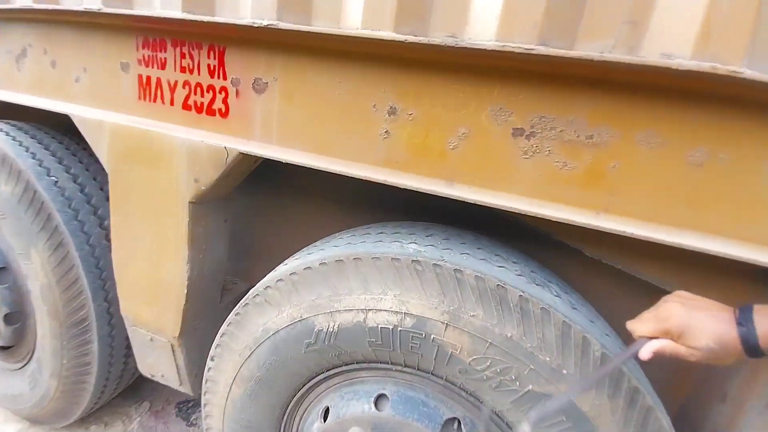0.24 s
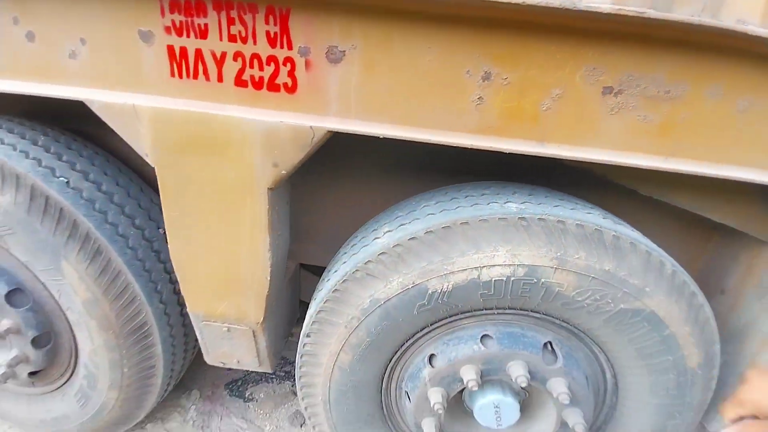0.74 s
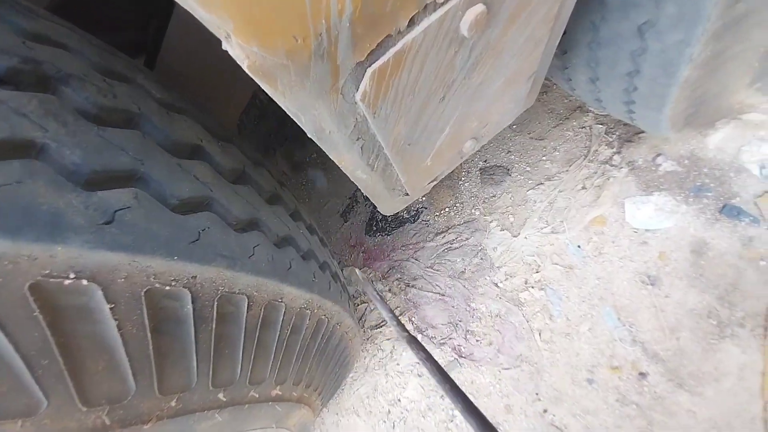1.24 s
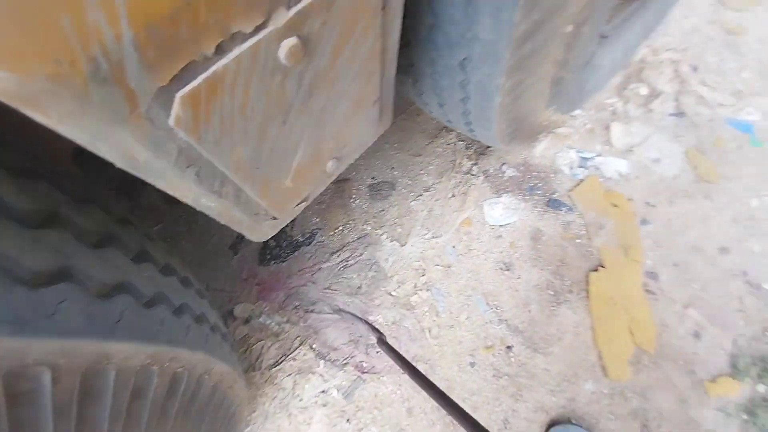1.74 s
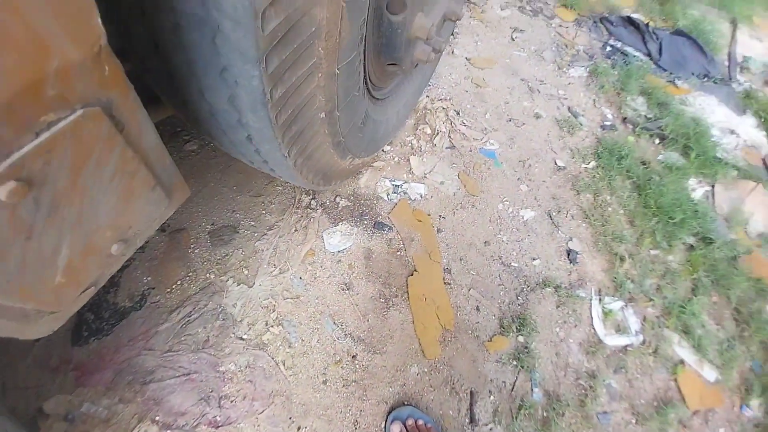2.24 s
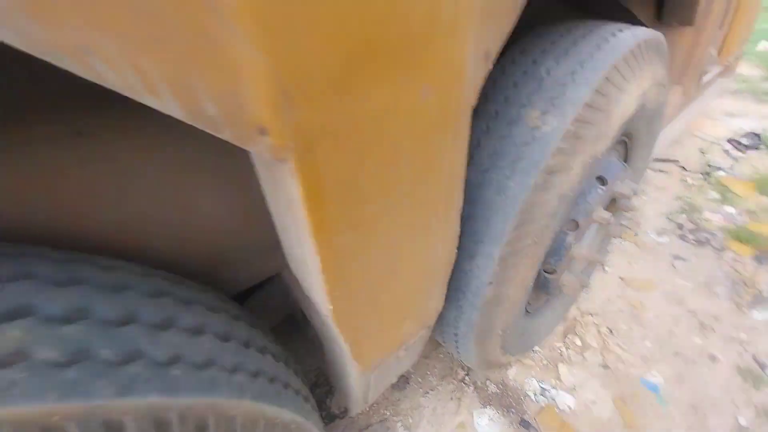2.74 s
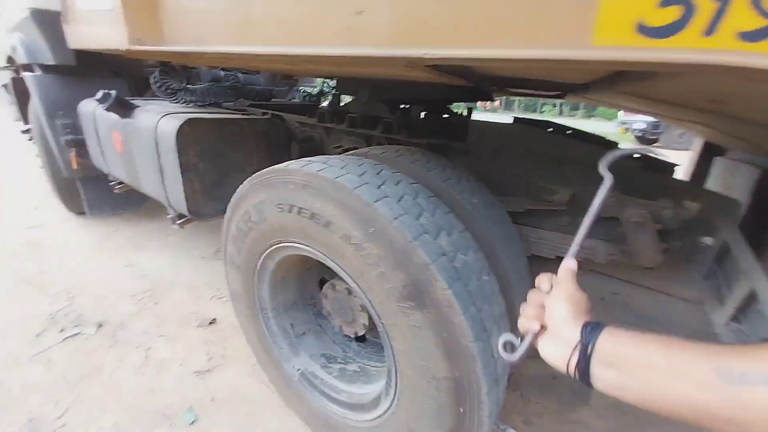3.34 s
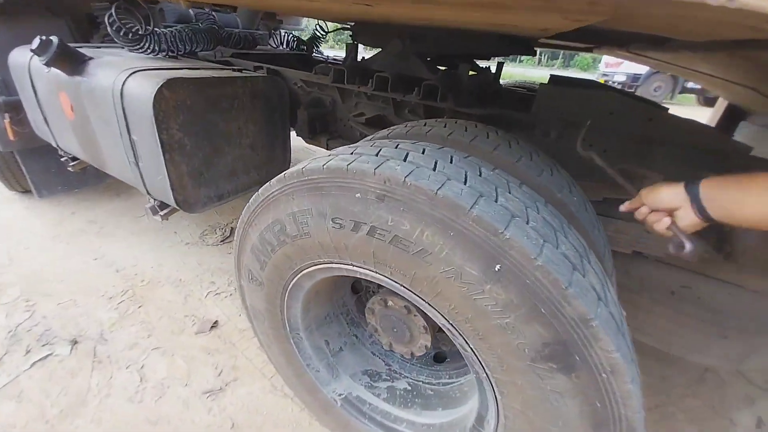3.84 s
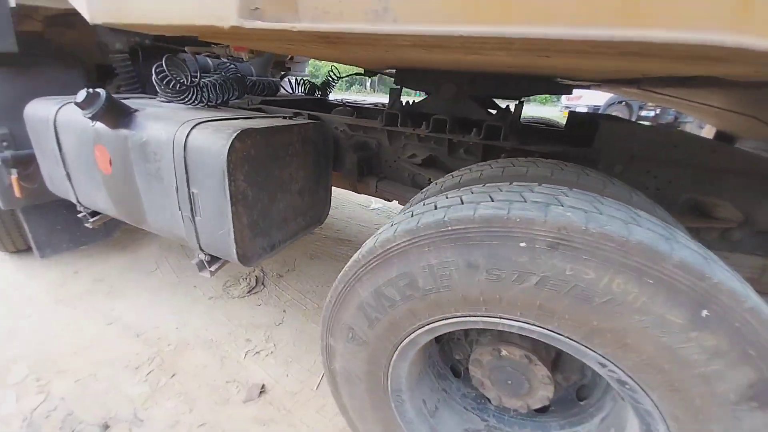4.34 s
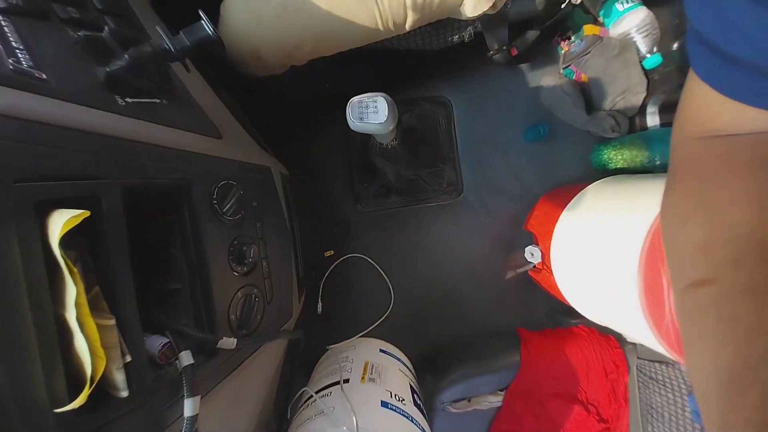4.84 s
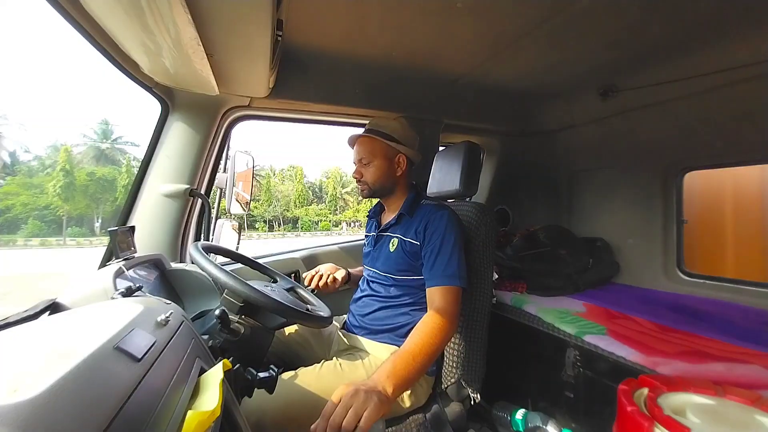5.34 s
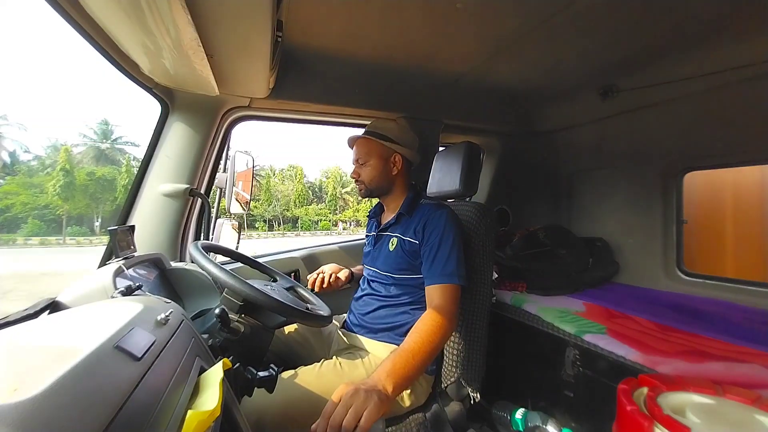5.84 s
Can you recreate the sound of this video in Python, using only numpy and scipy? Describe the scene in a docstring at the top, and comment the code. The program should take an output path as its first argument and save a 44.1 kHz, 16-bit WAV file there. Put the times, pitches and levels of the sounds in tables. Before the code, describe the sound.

Three boomy tyre knocks, a harsh metal scrape, then a louder clattering diesel idle with another double thump and a clink, ending inside the cab.

```python
"""A heavy truck idles: crank-order sines, noise bands and rattling firings, puffed by its air compressor.
A steel rod knocks on tyres (push, slap, boom, ringing modes), scrapes a steel bracket (random slips into
resonances) and clinks on the chassis; grit and scuffs are noise bursts. Three listening places follow one
another: trailer wheels, tractor unit, cab. A small pair of microphones hears it."""
import sys
import numpy as np
from scipy import signal
from scipy.io import wavfile

SR = 44100
rng = np.random.default_rng(int(sys.argv[2]) if len(sys.argv) > 2 else 0)


def waveform_to_disk(signal):
    """Save audio, clipped to [-1, 1], as 16-bit WAV at the path in sys.argv[1]."""
    frames = np.transpose(np.atleast_2d(signal))
    scaled = np.clip(frames, -1, 1) * 32767
    samples = np.round(scaled).astype(np.int16)
    wavfile.write(sys.argv[1], SR, samples)


N = 268569


def from_db(db):
    """dB to gain."""
    return 10 ** (np.asarray(db) / 20)


def rms_one(x):
    """Scale to rms 1."""
    return x / np.sqrt(np.mean(x ** 2) + 1e-20)


def in_time(rows):
    """Columns of a (time [s], value, ...) table, interpolated at every sample."""
    s, *columns = np.transpose(rows)
    return [np.interp(np.arange(N) / SR, s, column) for column in columns]


# bounds of trailer, tractor and cab: time [s]
PLACES_S = [0, 2.9703, 4.655, 6.1]


def by_place(values):
    """One value a place, held at every sample."""
    return np.asarray(values)[np.searchsorted(PLACES_S[1:3], np.arange(N) / SR)]


def at_hz(points, hz):
    """Read a (frequency [Hz], value) table on a log-frequency axis."""
    table = np.array(points)
    return np.interp(np.log(hz), np.log(table[:, 0]), table[:, 1])


def drift(rate_hz):
    """Slow chance of spread 1: noise through two equal poles at rate_hz."""
    step = 40
    r = np.exp(-2 * np.pi * step * rate_hz / SR)
    white = rng.standard_normal(N // step + 2002)
    slow = signal.lfilter([1], [1, -2 * r, r * r], white)[2000:]   # settled part
    return np.interp(np.arange(N) / step, np.arange(len(slow)), rms_one(slow))


def band_pass(x, low_hz, high_hz):
    """Second-order Butterworth band."""
    return signal.sosfilt(signal.butter(2, [low_hz, high_hz], "band", fs=SR, output="sos"), x)


def high_pass(x, low_hz):
    """First-order low cut."""
    return signal.sosfilt(signal.butter(1, low_hz, "high", fs=SR, output="sos"), x)


def ring(x, hz, t60_s):
    """Damped resonator: a unit click sets a sine of height 1 ringing."""
    r, w = from_db(-60 / (t60_s * SR)), 2 * np.pi * hz / SR
    return signal.lfilter([0, np.sin(w)], [1, -2 * r * np.cos(w), r * r], x + 1e-18)


def struck(times_s, levels_db, modes, spread_db):
    """Each blow excites each mode by chance in each ear; levels_db(hz) gives one level a blow."""
    at, out = np.round(np.array(times_s) * SR).astype(int), np.zeros((2, N))
    chance_db = rng.normal(0, spread_db, (len(at), len(modes), 2))
    sign = rng.choice([-1, 1], (len(at), len(modes), 1))
    for k, (hz, mode_db, t60_s) in enumerate(modes):
        clicks = np.zeros((2, N))
        clicks[:, at] = from_db(levels_db(hz) + mode_db + chance_db[:, k].T) * sign[:, k].T
        out += ring(clicks, hz, t60_s)
    return out


def burst(s, top_db, low_hz, high_hz, rise_s, t60_s):
    """Band-limited crunch that swells to its top at s and dies, partly unlike in the two ears."""
    out, t = np.zeros((2, N + SR)), np.arange(SR // 2) / SR
    crunch = rng.standard_normal(len(t)) + 1.54 * rng.standard_normal((2, len(t)))
    crunch = rms_one(band_pass(crunch, low_hz, high_hz))
    swell = np.minimum(t / rise_s, 1) ** 2
    decay = from_db(top_db - 60 * np.maximum(t - rise_s, 0) / t60_s)
    start = round((s - rise_s) * SR)
    out[:, start:start + len(t)] = crunch * swell * decay
    return out[:, :N]


def pan(x, left_minus_right_db):
    """Set the left-right balance."""
    return x * from_db(np.array([[.5], [-.5]]) * left_minus_right_db)


def right_later(pair, lag_samples):
    """Longer path to the right microphone delays its channel."""
    n = np.arange(N)
    return np.array([pair[0], np.interp(n - lag_samples, n, pair[1])])


# crankshaft speed: (time [s], speed [turns/s])
CRANK = [(0, 11.69), (4.65, 11.69), (5.2, 11.66), (5.35, 11.8), (5.6, 11.67), (6.09, 11.68)]


def crank_turns():
    """Crank angle in turns: the running sum of its speed."""
    return np.cumsum(in_time(CRANK)[0]) / SR


# six cylinders fire 3 times a turn: order [cycles/turn]
ENGINE_ORDERS = [3, 4.5, 5, 6, 6.5, 8, 9, 12, 13.5, 14, 15, 17, 18, 21, 24, 36, 37, 69.5, 72]
# one row a place, one column an order: mean level [dB], before waver
ORDER_DB = [
    [-45, -55, -51, -40, -46, -47, -41.5, -41, -62.5, -55, -56.5, -41.5, -65, -39.5, -53.5, -57.5, -58, -70,
     -60],
    [-29, -43.5, -59, -40.5, -39, -38.5, -35.5, -28.5, -33, -31, -29, -40.5, -31.5, -39, -35.5, -48.5,
     -43.5, -60, -59],
    [-26, -51, -53, -41, -57, -43, -27, -37, -39.5, -48, -36.5, -45, -40.5, -46, -41, -49, -58, -72, -52.5],
]
# listener passes through an order's standing wave:
# (order [cycles/turn], time of top [s], added level [dB], half length [s])
BOOMS = [(21, 2.07, -38.5, 0.16), (21, 2.83, -34.5, 0.19), (21, 3.3, -28.5, 0.059), (24, 3.6, -30, 0.052),
         (24, 4.04, -29, 0.2), (37, 2.135, -48.5, 0.17), (37, 3.21, -36.5, 0.16), (37, 4.22, -38.5, 0.33),
         (72, 3.05, -39.5, 0.086), (72, 3.25, -43, .08), (69.5, 3.4, -40, 0.087), (72, 3.5, -38, .13)]


def engine_tones():
    """Crank orders as sines wavering in level and phase; some boom for a while."""
    t, angle = np.arange(N) / SR, 2 * np.pi * crank_turns()
    out = 0
    for order, place_db in zip(ENGINE_ORDERS, np.transpose(ORDER_DB)):
        gain = from_db(by_place(place_db))
        for boom_order, s, db, half_s in BOOMS:
            if abs(boom_order - order) < .25:
                gain = gain + from_db(db) * np.exp(-((t - s) / half_s) ** 2)
        gain = gain * from_db((1 + order / 18) * drift(2 + order / 8))
        phase = order * angle + rng.uniform(0, 2 * np.pi) + .018 * order * drift(4)
        out = out + np.sqrt(2) * gain * np.sin(phase)
    return out


DIESEL_KNOCK_DB = [-62, -41.5, -52]   # one a place


def diesel_knock():
    """Each firing starts a short rattle of uneven strength that rings the engine block."""
    firings = 3 * crank_turns()
    strength_db = rng.normal(0, 4, int(firings[-1]) + 1)[firings.astype(int)]
    decay_db = -15 * (firings % 1)
    rattle = rng.standard_normal((2, N)) * from_db(strength_db + 3 * drift(5) + decay_db)
    block = sum(ring(rattle, hz, 0.0031) for hz in (800, 1220, 1930, 2530, 3800, 4940))
    return from_db(by_place(DIESEL_KNOCK_DB)) * rms_one(block)


# left-right likeness of engine noise: (frequency [Hz], likeness [0-1])
LIKENESS = [(60, 0.82), (250, 1), (700, 0.82), (2000, 0.035), (15000, 0.051)]


def engine_noise(colours, low_hz, high_hz, repeating, patchy_db):
    """Stereo noise bands coloured by place, rms 1 at each; a share repeats every two-turn cycle."""
    cycle = round(2 * SR / CRANK[0][1])
    white = rng.standard_normal((2, 2, N))      # neighbouring bands get unrelated noise
    again = np.resize(rng.standard_normal(cycle), N)
    again = np.array([again, np.roll(again, cycle // 3)])
    white[:, 0] = np.sqrt(1 - repeating) * white[:, 0] + np.sqrt(repeating) * again
    edges = np.geomspace(low_hz, high_hz, round(2.5 * np.log2(high_hz / low_hz)) + 1)
    out, together = 0, 0.5 * drift(4.1)
    for k, (low, high) in enumerate(zip(edges, edges[1:])):
        mid, side = band_pass(white[k % 2], low, high)
        hz = np.sqrt(low * high)
        alike = at_hz(LIKENESS, hz)
        colour_db = by_place([at_hz(colour, hz) for colour in colours])
        gain = from_db(colour_db + patchy_db * (together + drift(24)))
        out = out + gain * (np.sqrt(1 + alike) * mid + np.sqrt(1 - alike) * side * [[1], [-1]])
    parts = np.split(out, [round(s * SR) for s in PLACES_S[1:3]], axis=1)
    return np.hstack([rms_one(part) for part in parts])


# one table a place: (time [s], rumble level [dB], clatter and hiss level [dB])
ENGINE = [
    [(0, -28, -53.5), (.4, -25.5, -50.5), (.9, -28, -45.5), (1.6, -31, -48), (2.4, -31.5, -47),
     (2.96, -26, -43.5)],
    [(2.975, -23.5, -33.5), (3.8, -25, -35), (4.65, -24.5, -32)],
    [(4.66, -28, -39), (5.25, -27, -39), (5.4, -27, -42.5), (6.09, -27.5, -41.5)],
]
# rumble colour, one table a place: (frequency [Hz], relative density [dB per Hz])
RUMBLE = [
    [(30, -14), (50, -11), (90, -1), (160, -3), (250, -5), (330, -11), (430, -16.5), (620, -23)],
    [(30, -25), (60, -23), (100, -6.5), (160, 0.5), (220, -1), (300, -7), (430, -7.5), (620, -16)],
    [(30, -18), (60, -8), (105, -4), (170, -6.5), (240, -12.5), (330, -11), (450, -30.5), (620, -9.5)],
]
# clatter colour at each place: (frequency [Hz], relative density [dB per Hz])
TRAILER = [(350, -35), (600, -16), (823, -3), (894, -9.5), (1010, -12), (2150, -26.5), (2270, -33.5),
           (4460, -30), (8040, -37), (13400, -42.5), (16000, -44.5)]
TRACTOR = [(350, -33), (600, -4), (823, -2), (894, -6), (1190, -4.5), (1440, -11), (1660, -11.5),
           (5180, -20), (8380, -24.5), (12000, -29), (16000, -31)]
CAB = [(350, -31), (600, -4.5), (997, -8.5), (1190, -8.5), (1660, -15), (3630, -23), (4580, -18.5),
       (7210, -27.5), (8380, -25), (12000, -25), (16000, -33)]
PUFF_HZ, PUFF_PEAK_S = 13.08, 3.04   # compressor strokes
PUFF_DB = [.5, 2.1, .6]   # swing either way, one a place


def engine():
    """Tones, knock, rumble, and clatter swelling with each firing and compressor stroke."""
    rumble_db, clatter_db = np.choose(by_place([0, 1, 2]), [in_time(rows) for rows in ENGINE])
    t = np.arange(N) / SR
    stroke = np.cos(2 * np.pi * PUFF_HZ * (t - PUFF_PEAK_S) + 0.047 * drift(1.5))
    puffs_db = by_place(PUFF_DB) * stroke
    firing_db = .4 * np.cos(2 * np.pi * 3 * crank_turns())
    rumble = engine_noise(RUMBLE, 27.2, 610.0, repeating=.38, patchy_db=1.02)
    clatter = engine_noise([TRAILER, TRACTOR, CAB], 616, 16300, repeating=0, patchy_db=1.5)
    noise = from_db(rumble_db) * rumble + from_db(clatter_db + puffs_db + firing_db) * clatter
    return engine_tones() + diesel_knock() + noise


def whisper():
    """Faint narrow hiss by the first wheels: steady band noise, cut off at 0.93 s."""
    hiss = rms_one(band_pass(rng.standard_normal((2, N)), 2060, 2650))
    return from_db(-63) * hiss * (np.arange(N) < 0.93 * SR)


# rod on tyre: knocks, each a main blow with or without a later swing or bounce:
# (time [s], body peak [dB], contact cut-off before CUT_SCALE [Hz],
# ring length share [1], push against body peak [dB])
KNOCKS = [(0.001, -5, 500, 1.4, -2), (0.012, -8, 400, .7, -10), (0.2349, -1, 1100, 1, -1),
          (0.2432, -3, 420, .6, -5), (0.4555, -1.5, 1350, 1.1, 1), (0.4995, -7, 324, 1.2, -34),
          (3.5943, -4, 566, 0.22, -4), (3.6008, -6, 500, 0.22, -8), (3.966, -24, 413, .5, 2)]
# carcass and air modes before place pitch, chance and length share:
# (frequency [Hz], level [dB], t60 [s])
TYRE = [(118.8, -18.5, 1), (138.3, -13.5, 0.54), (187.6, -3, 0.85), (225.7, -2.5, 0.13), (255.5, -11, 0.45),
        (340, -10, 0.7), (422.5, -17, 0.15), (500, -15, 0.07), (522, -15, 0.08), (676, -9.5, 0.045),
        (768, -12, 0.062), (950, -15, .04), (1170, -14, 0.035)]
TYRE_PITCH = [0.99, .84, 1]   # factor a place: the drive tyre sounds lower
CUT_SCALE = 1.35
AIR_TOP_HZ = 150   # air modes below start in alternate directions; carcass modes start together
PAIR_SPLIT, SIDE_MODE_DB = .022, -8   # outer modes of each cluster of three: nominal offset share, level
TYRE_LOW_HZ, PUSH_LOW_HZ = 72, 275
BODY_LAG_S = 0.00059   # carcass swings back this long after the push
SLAP_DB, SLAP_T60_S, SLAP_LOW_HZ, SLAP_TOP_HZ = -33, 0.02, 3400, 10000   # before band filter, re push
BOOM_DB, BOOM_LOW_HZ, BOOM_HIGH_HZ = -21, 120, 380   # re body peak
BOOM_T60_S = .5   # before length share


def tyre_body(click, pitch, share):
    """Carcass and air ring as clusters of three slightly split modes."""
    body = 0
    for k, (hz, db, t60_s) in enumerate(TYRE):
        sign = -(-1) ** k if hz < AIR_TOP_HZ else 1
        for side in (-1, 0, 1):
            gain = from_db(db + abs(side) * SIDE_MODE_DB + rng.normal(0, 1))
            mode_hz = hz * pitch * (1 + side * PAIR_SPLIT * rng.uniform(0.36, 1.75))
            body = body + sign * gain * ring(click, mode_hz, t60_s * share)
    return body


def tyre_knocks():
    """Blow: direct push, faint slap, blurry wheel and axle boom, then the ringing tyre."""
    out, length = np.zeros(N + SR), SR
    click, t = np.eye(1, length)[0], np.arange(length) / SR
    pitch = by_place(TYRE_PITCH)
    for s, peak_db, cut_hz, share, push_db in KNOCKS:
        body = tyre_body(click, pitch[round(s * SR)], share)
        soft = np.tile(signal.butter(2, CUT_SCALE * cut_hz, fs=SR, output="sos"), (3, 1))
        body = signal.sosfilt(soft, high_pass(body, TYRE_LOW_HZ))
        push = signal.sosfilt(soft, high_pass(click, PUSH_LOW_HZ))
        slap = rng.standard_normal(length) * from_db(SLAP_DB - 60 * t / SLAP_T60_S)
        slap = band_pass(slap, SLAP_LOW_HZ, SLAP_TOP_HZ)
        boom = rms_one(band_pass(rng.standard_normal(length), BOOM_LOW_HZ, BOOM_HIGH_HZ))
        boom = boom * from_db(BOOM_DB - push_db - 60 * t / (BOOM_T60_S * share))
        blow = slap + boom - push / push.max()
        out[round(s * SR):][:length] += from_db(peak_db + push_db) * blow
        body = from_db(peak_db) * body / np.abs(body).max()
        out[round((s + BODY_LAG_S) * SR):][:length - 200] += body[:-200]
    return out[:N]


def underbody(x, top_hz):
    """Dull echoes off ground, chassis and container, other ones in each ear."""
    out = np.zeros((2, N))
    for k, lag in enumerate((rng.uniform(0.0027, .07, 24) * SR).astype(int)):
        gain = from_db(-60 * lag / SR / 0.088) * rng.choice([-1, 1])
        out[k % 2, lag:] += x[k % 2, :-lag] * gain
    return signal.sosfilt(signal.butter(1, top_hz, fs=SR, output="sos"), out)


# (time of top [s], level at top [dB], low [Hz], high [Hz], t60 [s], left minus right [dB])
GRIT = [(0.507, -55, 4500, 7800, .015, 0), (0.846, -42, 1500, 12000, .008, 1),
        (1.3315, -28, 1500, 11000, .025, -3), (1.336, -38, 1200, 9000, .13, -3),
        (1.5925, -26, 800, 1700, .03, 0), (1.5925, -37, 3400, 5600, .015, 0),
        (1.772, -43.5, 4600, 9950, .03, -2), (2.5756, -48, 2500, 5500, 0.037, 3),
        (2.6516, -41, 1960, 8250, 0.05, 2), (2.709, -40, 5400, 15000, .04, 2),
        (2.709, -46, 900, 5000, .02, 2), (2.7343, -48, 6500, 13000, .025, -6),
        (2.847, -50, 7000, 15000, .017, 2), (4.3589, -22, 7000, 15800, .02, -6),
        (4.3645, -28, 6000, 15800, .06, -6), (5.3367, -32.5, 1000, 8950, 0.013, 6)]
GRIT_RISE_S = 0.00091


def grit():
    """Grit and ticks: abrupt noise bursts."""
    out = 0
    for s, db, low_hz, high_hz, t60_s, pan_db in GRIT:
        out = out + pan(burst(s, db, low_hz, high_hz, GRIT_RISE_S, t60_s), pan_db)
    return out


# (time of top [s], level at top [dB], low [Hz], high [Hz], rise [s], t60 [s])
SCUFFS = [(0.73, -54, 2700, 11000, .05, .7), (0.76, -49, 2020, 2700, .08, .8),
          (1.745, -41, 1900, 15500, .018, 0.055), (1.11, -21.5, 106, 240, .06, .25),
          (2.748, -50, 3400, 6500, .015, .06)]


def scuffs():
    """Noise bursts that swell and fade."""
    return sum(burst(*row) for row in SCUFFS)


# drag over the bracket: (time [s], rod drag [dB], bracket drag [dB])
DRAG = [(1.045, -52, -60.5), (1.073, -42, -59), (1.079, -32, -46), (1.089, -37.5, -39), (1.111, -17, -28),
        (1.121, -21.5, -26), (1.131, -33, -27), (1.143, -22, -30.5), (1.155, -20, -12), (1.167, -24.5, -17),
        (1.179, -18.5, -11.5), (1.193, -33, -25), (1.215, -47, -40)]
# rasp resonances before flutter: (frequency [Hz], width [Hz], relative level [dB])
ROD_RASP = [(4400, 1600, 6), (6540, 4200, 0), (10400, 3400, -15), (14800, 2000, -12)]
BRACKET_RASP = [(1080, 1200, 6), (2290, 880, 3.5), (3050, 970, -17)]
# bracket and rod modes: (frequency [Hz], relative level [dB], t60 [s])
STEEL = [(2080, -18, .06), (2570, -16, .08), (3280, -19, .08), (3994, -16, .16), (4400, -12, .03),
         (5125, -16, .08), (5645, -7, .04), (6800, -10, .03), (7220, -8, .025), (8760, -15, .07),
         (9390, -14, .08), (10780, -9, .08), (10980, -13, .12), (12550, -16, .07), (13400, -18, .05),
         (14250, -21, .05), (15600, -19, .05)]
SLIPS_PER_S, SING_DB, RASP_DB = 1500, -25, -2
CHATTER_DB, CHATTER_HZ = 3, 120   # slips clump
RASP_FLUTTER_DB, RASP_FLUTTER_HZ = 2.5, 40   # each resonance on its own


def rasp(slips, drag, peaks):
    """Slips excite broad flickering resonances, scaled by the drag."""
    out = 0
    for hz, width_hz, db in peaks:
        gain = from_db(db + RASP_FLUTTER_DB * drift(RASP_FLUTTER_HZ))
        out = out + gain * signal.lfilter(*signal.iirpeak(hz, hz / width_hz, SR), slips)
    return from_db(RASP_DB) * drag * rms_one(out)


def scrape():
    """Dense uneven slips rasp in rod and bracket and keep the steel modes singing."""
    t = np.arange(N) / SR
    touching = (t > DRAG[0][0]) & (t < DRAG[-1][0])
    rod_drag, bracket_drag = touching * from_db(in_time(DRAG))
    size = from_db(4 * np.minimum(rng.exponential(1, N), 3)) * rng.choice([-1, 1], N)
    slips = rms_one((rng.random(N) < SLIPS_PER_S / SR) * size)
    slips = slips + .8 * rng.standard_normal((2, N))
    slips = rms_one(slips * from_db(CHATTER_DB * drift(CHATTER_HZ)))
    singing = sum(from_db(db + SING_DB) * ring(rod_drag * slips, hz, t60_s) for hz, db, t60_s in STEEL)
    return rasp(slips, rod_drag, ROD_RASP) + rasp(slips, bracket_drag, BRACKET_RASP) + singing


# rod catches on the bracket: (time [s], level before mode and chance [dB], favoured mode [Hz])
CATCHES = [(1.079, -15, 4350), (1.093, -32, 10840), (1.0945, -20.5, 7000), (1.103, -20, 5200),
           (1.1084, -6, 7160), (1.112, -14, 10760), (1.119, -11, 4000), (1.136, -15, 7200),
           (1.1408, -12, 7020), (1.142, -12, 5640), (1.1515, -7, 7100), (1.1563, -10, 7000),
           (1.159, -13, 5660), (1.1759, -9, 5640), (1.178, -5, 5640), (1.183, -26, 11600),
           (1.187, -11, 4000)]


def rod_catches():
    """Each catch strikes the steel modes, 45 dB weaker per octave off the favoured one."""
    s, rod_db, favoured_hz = np.transpose(CATCHES)
    return struck(s, lambda hz: rod_db - 45 * np.abs(np.log2(hz / favoured_hz)), STEEL, spread_db=2.5)


# rod on the bracket's plate: (time [s], level before mode and chance [dB])
BANGS = [(1.1525, -9.5), (1.158, -12.5), (1.167, -14), (1.1767, -15.5), (1.1875, -19), (1.3345, -22)]
# plate modes: (frequency [Hz], relative level [dB], t60 [s])
PLATE = [(786, -11, .06), (915, -27, .25), (942, -22.5, .4), (975, -25, .25), (1018, -3, .09),
         (1055, -8, .06), (1200, -14, .05), (1500, -12, .07), (1750, -19, .12), (2020, -14, .05),
         (2100, -15, .05), (2450, -14, .04), (2870, -16, .04)]


def plate_bangs():
    """Rod bangs ring the plate modes."""
    s, bang_db = np.transpose(BANGS)
    return struck(s, lambda hz: bang_db, PLATE, spread_db=2.5)


LIFT_S = 1.19   # rod leaves the bracket
FRAME_DB, FRAME_LOW_HZ, FRAME_HIGH_HZ, FRAME_T60_S = -32.5, 696, 2420, 0.35


def frame_rumble():
    """Trailer frame noise swells from the first bang to the lift, then dies."""
    return burst(LIFT_S, FRAME_DB, FRAME_LOW_HZ, FRAME_HIGH_HZ, LIFT_S - BANGS[0][0], FRAME_T60_S)


CLINK_S, CLINK_DB = [4.3592, 4.3648], [-29, -32.5]   # touch and bounce; before mode and chance
GRIP_S, GRIP_T60_S = 4.392, 0.04   # the hand stills the rod
# loosely held rod modes: (frequency [Hz], relative level [dB], t60 before grip [s])
FREE_ROD = [(4602, -2, 0.11), (6790, -5, .25), (7320, -9, 0.089), (9690, 0, .06), (10720, -14, .2),
            (10980, -2, 0.13), (12530, -6, 0.22), (13410, -3, .053), (14340, 1, .059), (15550, -2, .039)]


def chassis_clink():
    """Loosely held rod rings off the chassis until gripped."""
    clink = struck(CLINK_S, lambda hz: np.array(CLINK_DB), FREE_ROD, spread_db=2.0)
    return clink * from_db(-60 * np.clip(np.arange(N) / SR - GRIP_S, 0, 1) / GRIP_T60_S)


THUD_S, THUD_LOW_HZ, THUD_HIGH_HZ, THUD_DB, THUD_T60_S = 4.372, 380, 660, -15.5, .12


def chassis_thud():
    """Chassis answers the clink: low noise swelling from the first touch."""
    return burst(THUD_S, THUD_DB, THUD_LOW_HZ, THUD_HIGH_HZ, THUD_S - CLINK_S[0], THUD_T60_S)


def cab_squeak():
    """Short narrow noise burst in the cab."""
    return burst(5.796, -40, 2670, 3530, rise_s=.004, t60_s=0.12)


TRUCK_LAG, STEEL_LAG = 12, 7   # right channel delay, samples
LEFT_DB = [-0.5, -1.45, -0.7]   # left minus right, one a place


def scene():
    """All sources; engine, grit and tyre knocks share one microphone lag, steel sounds a shorter one."""
    background = engine() + whisper() + grit() + scuffs() + cab_squeak()
    knocks = right_later(pan(tyre_knocks(), -2.6), TRUCK_LAG)
    bracket = pan(scrape() + rod_catches() + plate_bangs() + frame_rumble(), -2.4)
    chassis = pan(chassis_clink(), -12.0) + chassis_thud()
    steel = right_later(bracket + chassis, STEEL_LAG)
    echoes = from_db(-13.5) * (underbody(knocks, top_hz=900) + underbody(steel, top_hz=4000))
    return pan(right_later(background, TRUCK_LAG) + knocks + steel + echoes, by_place(LEFT_DB))


NOTCH_HZ, NOTCH_WIDTH_HZ, NOTCH_DEPTH, CUTOFF_HZ = 8620, 2900, 0.65, 16150


def record(dry):
    """Microphone housing dips the treble; peaks are rounded, the top is cut."""
    b, a = signal.iirpeak(NOTCH_HZ, NOTCH_HZ / NOTCH_WIDTH_HZ, SR)
    heard = dry - NOTCH_DEPTH * signal.lfilter(b, a, dry)
    rounded = 1.295 * np.tanh(heard / 1.335)
    return signal.sosfilt(signal.cheby2(20, 50, CUTOFF_HZ, fs=SR, output="sos"), rounded)


dry = scene()
out = record(dry)
waveform_to_disk(out)
```